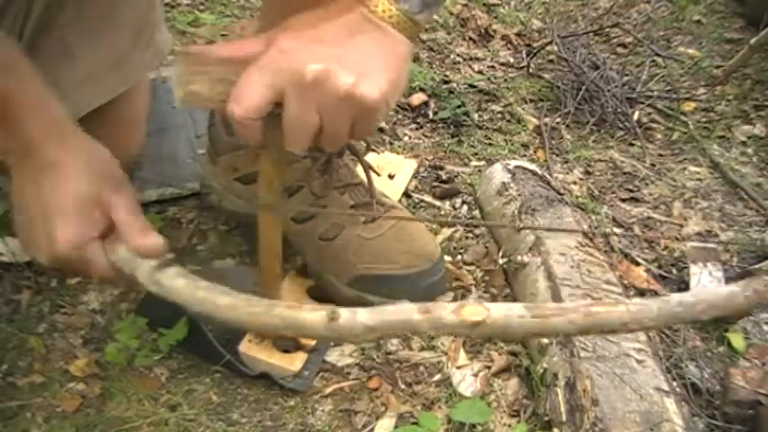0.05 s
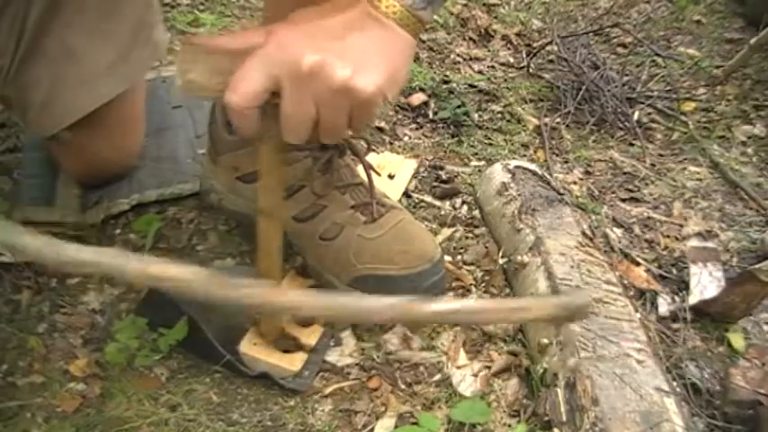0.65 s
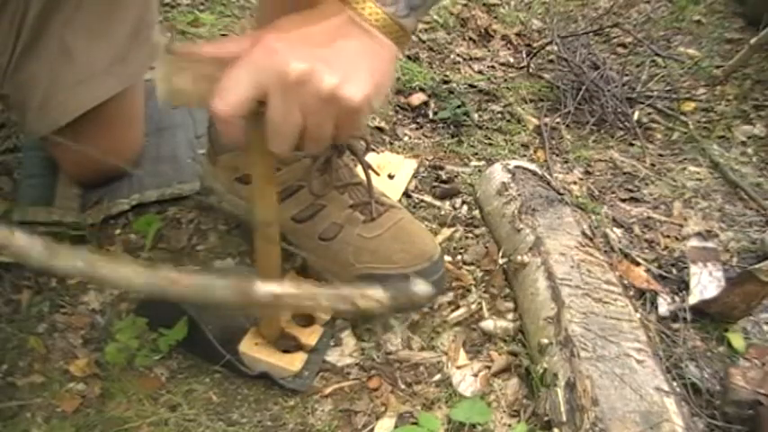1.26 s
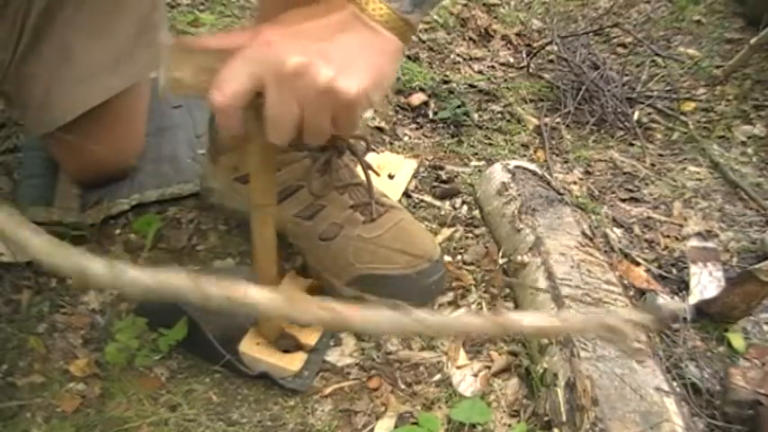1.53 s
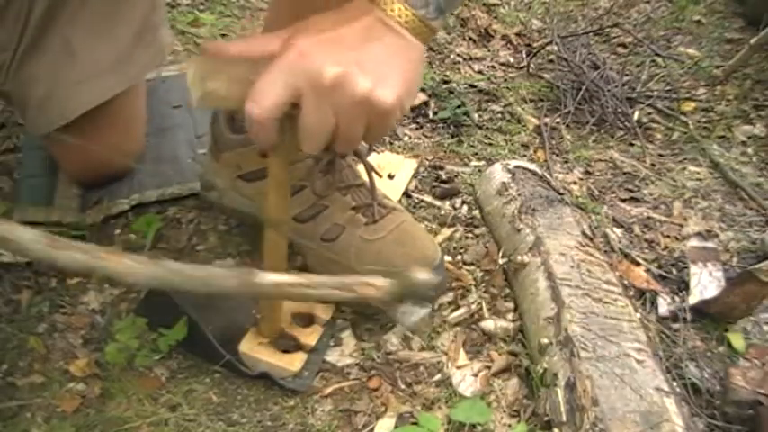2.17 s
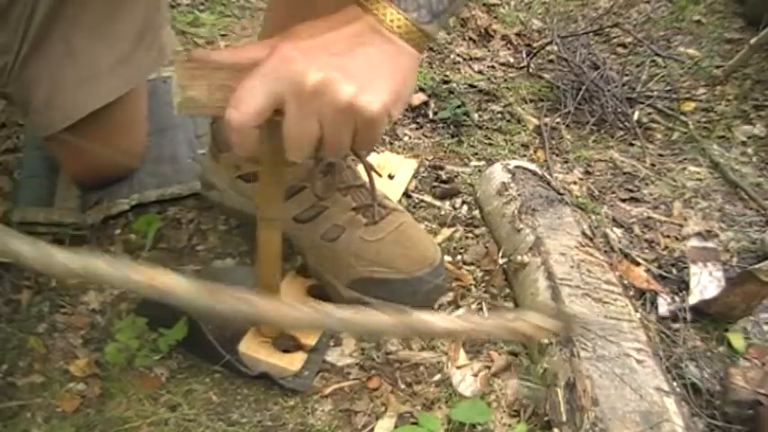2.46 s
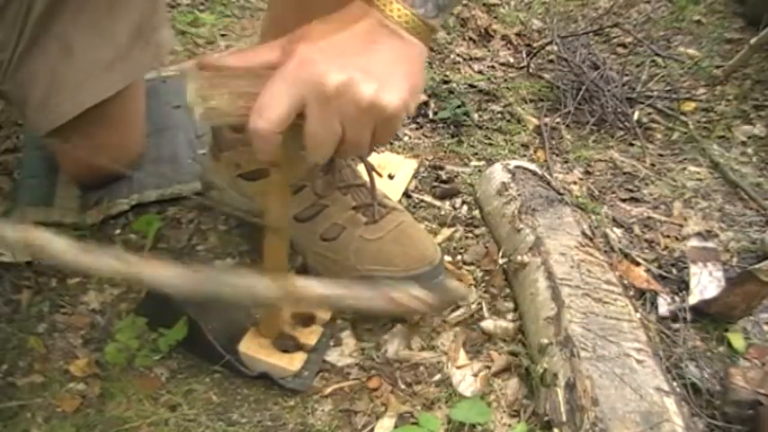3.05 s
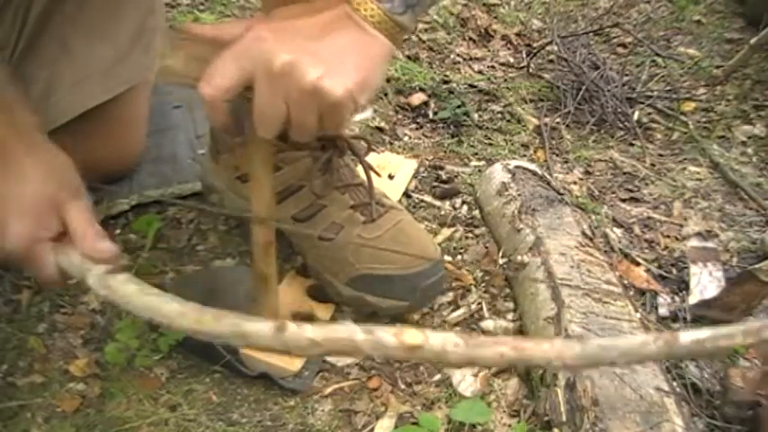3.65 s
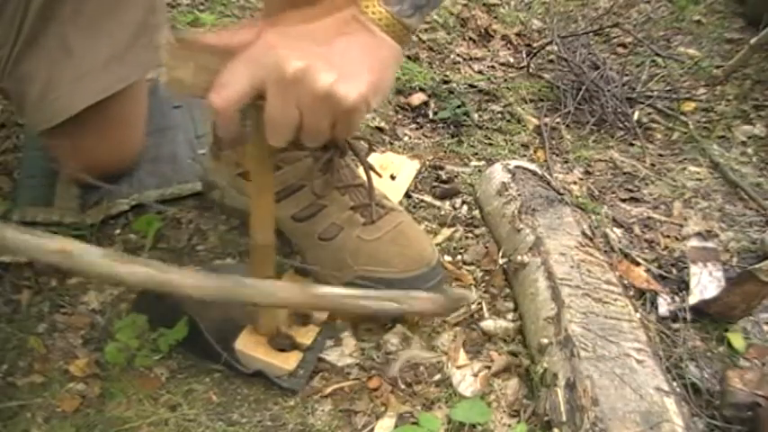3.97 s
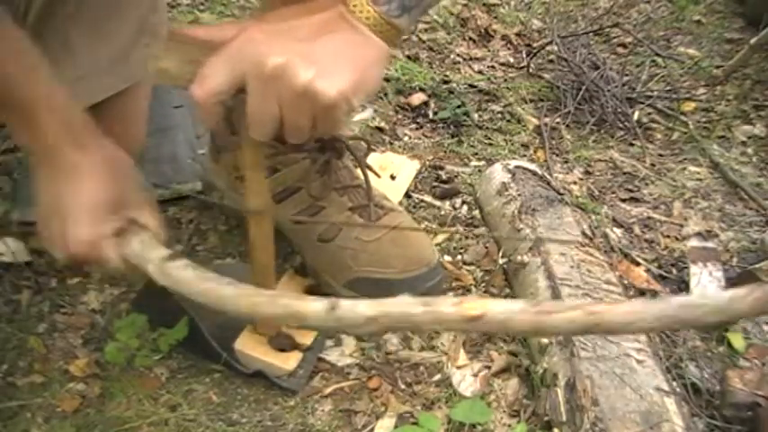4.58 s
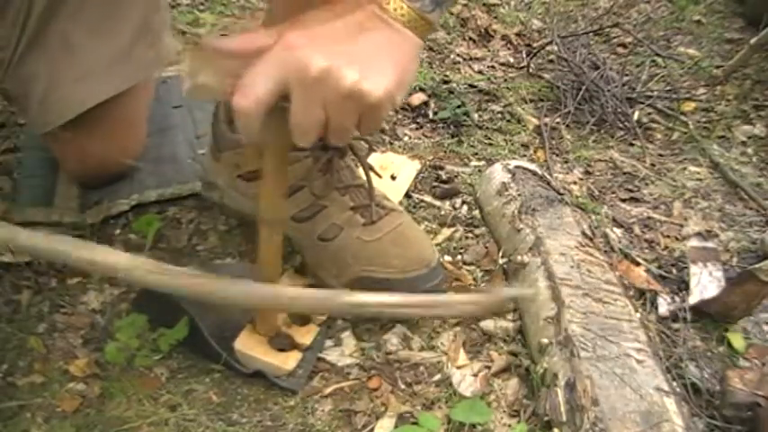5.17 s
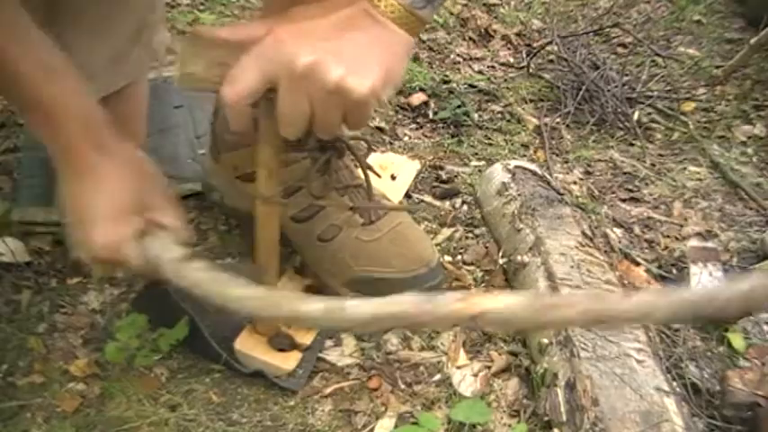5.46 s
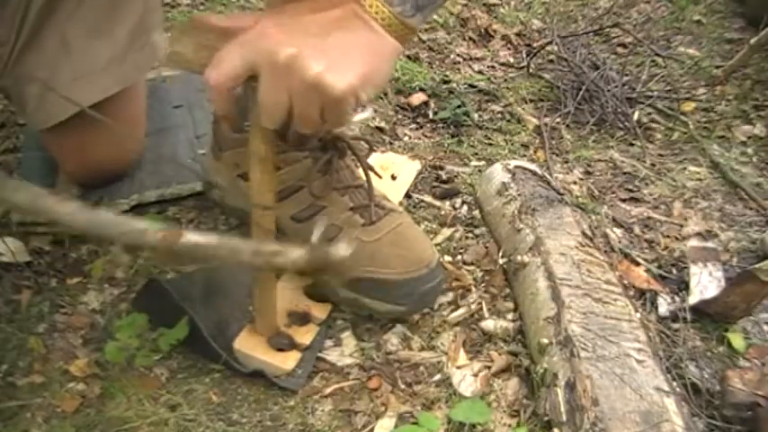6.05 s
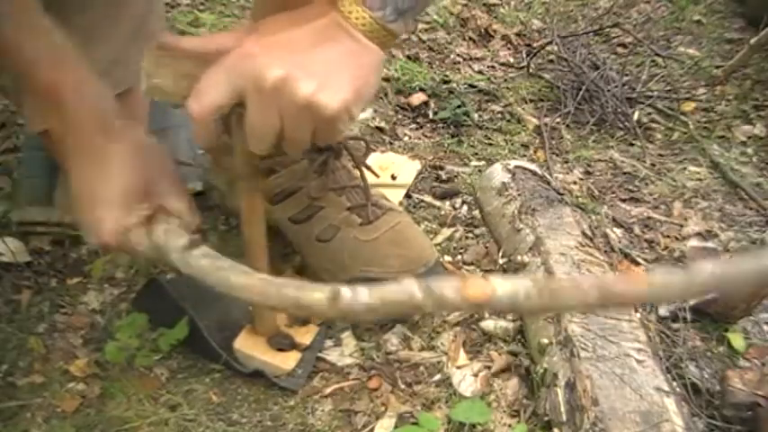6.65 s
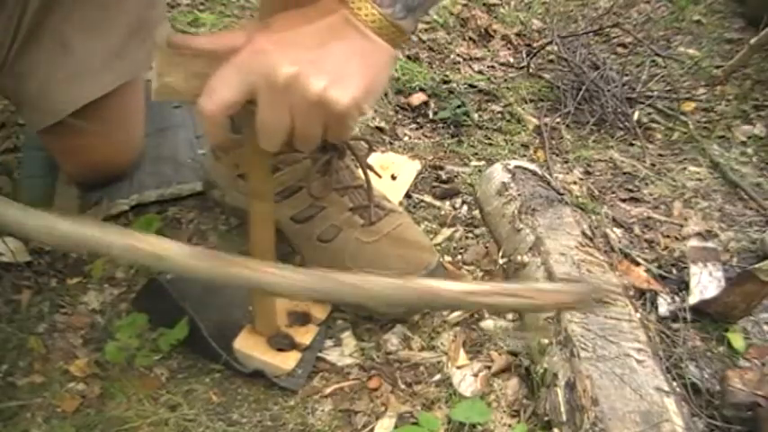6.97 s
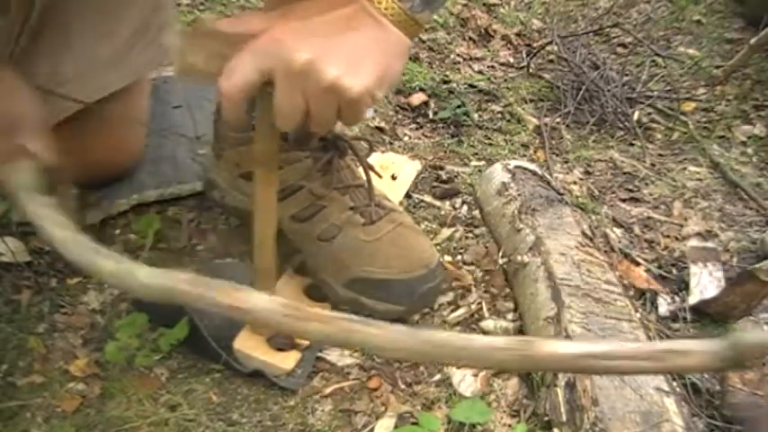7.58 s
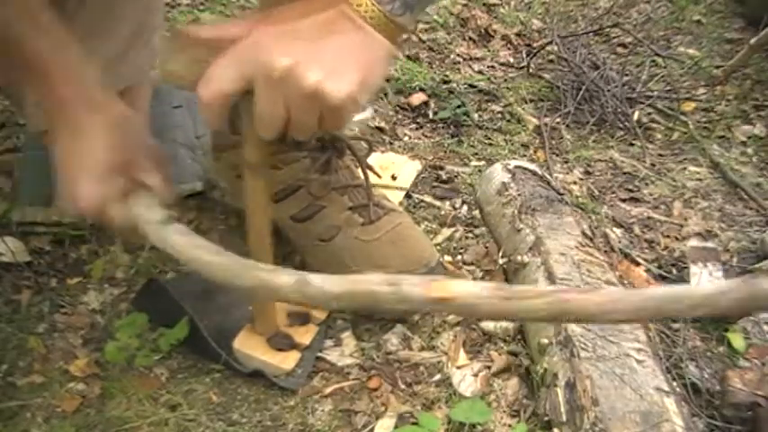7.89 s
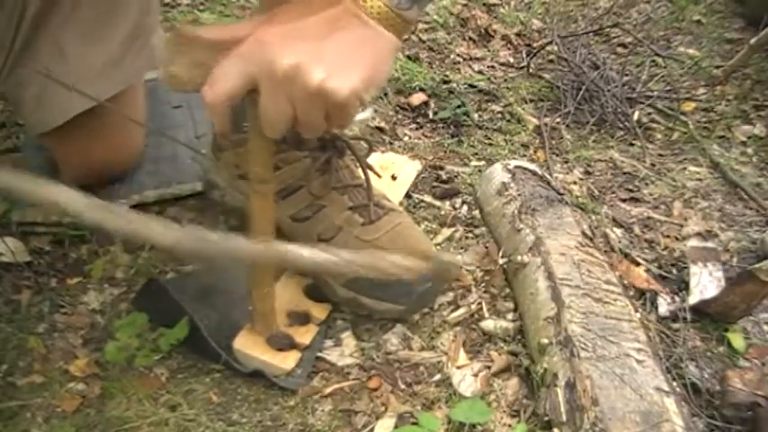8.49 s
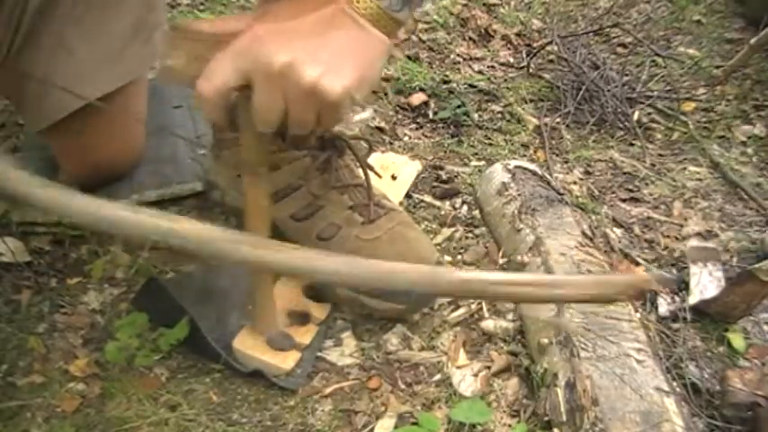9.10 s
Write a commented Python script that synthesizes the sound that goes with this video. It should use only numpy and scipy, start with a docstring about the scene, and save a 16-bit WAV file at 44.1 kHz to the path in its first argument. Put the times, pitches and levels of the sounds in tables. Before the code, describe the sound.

A wooden bow drill is sawn back and forth close to the microphone for about nine seconds, at a little over two full strokes a second. It opens with a dry, pulsing hiss of wood on wood, over faint moving air and a distant engine hum that both fade within a second or so. From 0.4 seconds, each cycle brings a short, shrill stutter of two to five squeaks, loudest around 0.9 and 1.4 seconds, where they overload slightly. The hiss recedes by 2 seconds and the squeaks carry on evenly, with single chirps between them and an occasional tiny cord creak. From about 5 seconds the squeaks become a little lower, raspier and gradually weaker. From 7.5 seconds a gritty grinding grows under them, strongest at the end, as the air and engine faintly return. The woodland adds very little echo.

```python
"""Friction sounds of a bow drill

A bow drill is sawn back and forth on a woodland floor, the spindle reversing at every stroke. Sliding
friction makes its tip hiss and grind in the hearth board. At mid-stroke the tip catches about once a turn
in a stick-slip squeal, which breaks into a rasp as charred dust gathers. The cord creaks at some
reversals; the air moves and an engine drones far away."""
import sys
import numpy as np
from scipy import signal
from scipy.fft import rfft, irfft, next_fast_len
from scipy.io import wavfile
from scipy.ndimage import uniform_filter1d

SR = 44100
rng = np.random.default_rng(int(sys.argv[2]) if len(sys.argv) > 2 else 0)


def digitize_waveform(pressure):
    """Quantize a signal to 16-bit integers and store it at the path in sys.argv[1].

    Rows of a 2-D input are taken as channels; values are limited to [-1, 1].
    """
    field = np.atleast_2d(pressure).T
    bounded = np.clip(field, -1, 1)
    quanta = np.round(bounded * 32767).astype(np.int16)
    wavfile.write(sys.argv[1], SR, quanta)


N = 411453
TIME = np.arange(N) / SR

# squeals, runs of evenly spaced catches of the tip: first t/s, last t/s, number of catches,
# first level/dB, last level/dB, mid-run swell/dB, base f/Hz, base length of a catch/s
SQUEAL_RUNS = [(0.398, 0.447, 3, -15, -15, -6, 2680, .006), (0.635, 0.662, 2, -12, -22, 0, 2640, .012),
               (0.852, 0.874, 2, -4, -4, 0, 2490, .006), (1.312, 1.357, 3, -18, -1, -7, 2390, .006),
               (1.753, 1.822, 4, -7, -10.5, -2, 2460, .011), (2.205, 2.288, 5, -12, -14, 3, 2410, .01),
               (2.637, 2.698, 4, -12, -10, 2, 2440, .01), (3.078, 3.129, 4, -10, -10, 1, 2390, .009),
               (3.545, 3.562, 2, -11, -11, 0, 2500, .012), (3.837, 3.869, 2, -18, -17, 0, 2440, .01),
               (3.973, 4.057, 4, -10.5, -15.5, 1, 2450, .0105), (4.477, 4.548, 4, -10, -26, -3, 2370, .009),
               (4.714, 4.763, 3, -26, -33, 3, 2400, .006), (4.928, 4.987, 4, -14, -23, 3, 2380, .007),
               (5.159, 5.183, 2, -24, -19, 0, 2230, .008), (5.347, 5.4, 4, -13.5, -22, -10, 2350, .009),
               (5.551, 5.581, 2, -15.5, -17.5, 0, 2330, .013), (5.735, 5.788, 3, -13, -13, -5, 2270, .014),
               (5.962, 6.006, 3, -15.5, -23, 2, 2140, .013), (6.16, 6.213, 4, -23, -23, -2, 2570, .006),
               (6.362, 6.406, 3, -13, -27, 2, 2160, .012), (6.549, 6.592, 3, -13, -24, 4, 2270, .012),
               (6.78, 6.802, 2, -16, -26, 0, 2200, .01), (6.97, 7.029, 4, -16, -22, 4, 2270, .012),
               (7.186, 7.228, 3, -21, -25, 5, 2080, .011), (7.371, 7.454, 5, -24, -18, 1, 2450, .005),
               (7.621, 7.646, 2, -17, -24, 0, 2180, .015), (7.808, 7.885, 5, -30, -28, 0, 2450, .006),
               (8.027, 8.066, 3, -14, -22, 0, 2080, .012), (8.229, 8.286, 4, -31, -32, 5, 2430, .007),
               (8.462, 8.479, 2, -29, -18, 0, 2160, .013), (8.659, 8.714, 4, -22, -27, -2, 2500, .005),
               (8.893, 8.917, 2, -32, -23, 0, 2090, .01), (9.089, 9.143, 4, -19, -29, 1, 2450, .005),
               (9.278, 9.303, 2, -32, -33, 0, 2230, .014)]
# rasp of a squeal relative to its tone: t/s, pull level/dB, push level/dB
RASP_LEVELS = [(0, -17, -17), (3, -20, -32), (4.3, -23, -37), (5.4, -15, -22), (7, -18, -29),
               (8.3, -12, -26), (9.2, -6, -24)]
# lone clean chirps, mostly as the spindle starts or stops: t/s, level/dB, length/s
LONE_CHIRPS = [(0.921, -24, .006), (1.388, -28, .005), (2.431, -16.5, .008), (2.516, -26, .009),
               (2.865, -23.5, .008), (2.945, -27.5, .008), (3.404, -22, .007), (3.782, -22.5, .008),
               (4.285, -21.5, .008), (4.445, -35, .025), (4.89, -21, .008), (5.302, -20.5, .021),
               (5.701, -14, .015), (5.72, -17, .007), (6.106, -17.5, .007), (6.522, -15.5, .01),
               (6.936, -15.5, .008), (7.846, -17, .005), (8.201, -14.5, .006), (8.308, -21, .006)]
# their pitch, sinking as the socket wears: t/s, f/Hz
CHIRP_PITCH = [(1, 2750), (2.5, 2590), (4.3, 2560), (5, 2430), (8.3, 2440)]
# overtones of a squeak: harmonic number, smooth-socket level/dB, dusty-socket level/dB
HARMONICS = [(2, -2, -2), (3, -9, -6), (4, -21, -13), (5, -26, -28)]
# pace of the bow, a cycle being one pull and one push: t/s, cycles done
BOW_CYCLES = [(-0.145, 0), (0.308, 1), (1.21, 3), (2.14, 5), (2.57, 6), (3.445, 8), (4.385, 10),
              (4.835, 11), (5.26, 12), (5.665, 13), (6.065, 14), (6.485, 15), (6.895, 16), (7.73, 18),
              (8.575, 20), (9.395, 22)]
# relative friction noise at full bow speed: t/s, hiss/dB, grinding on the pull/dB, on the push/dB
FRICTION_LEVELS = [(0, -26.5, -31, -29), (.42, -23.5, -34, -30), (.65, -31, -37, -36), (1.1, -42, -41, -48),
                   (1.35, -37.5, -38, -45), (1.6, -45, -47, -47), (2.1, -49, -56, -53),
                   (4.2, -53, -57, -58), (5.35, -49, -46, -49), (6.9, -53.5, -54, -51),
                   (7.8, -49, -41, -44), (9.3, -46, -31, -38)]
# the tip crushes a bit of grit: t/s, extra grinding/dB
GRIT_CRUSHES = [(.255, 5), (.618, 10), (1.625, 7), (7.6, 5), (7.71, 9)]
# twitter of the polished tip relative to the hiss: t/s, level/dB
TWITTER_LEVELS = [(.1, -4), (1.1, 8), (2.2, 12), (4.3, 12), (5, 3), (8, 0)]
# the cord creaks as it takes up the pull: t/s, relative level/dB, f/Hz
CORD_CREAKS = [(0.3217, -21, 6760), (2.1112, -37, 7120), (6.6915, -31.5, 8420), (6.9132, -36.5, 7376),
               (8.1655, -27.5, 7900), (9.1744, -36, 7200)]

# noise spectra: f/Hz, relative spectral density/dB
RASP_SPECTRUM = [(100, -31), (300, -10), (500, -4.5), (900, -9.5), (1300, -.5), (1650, -7.5), (2300, 3),
                 (3000, -7), (3800, 3.5), (6000, -4), (8200, 1.5), (10000, -31.5), (15000, -25)]   # chaotic slipping
HISS_SPECTRUM = [(400, -17), (1500, -12), (2500, -1), (3200, -2), (3750, 3), (4450, 7.5), (5100, -2),
                 (5900, 6), (7000, -4), (8300, 4), (9300, -11.5), (11000, -16.5), (13500, -35.5),
                 (15500, -39)]   # dry wood on wood
SMOOTH_SPECTRUM = [(60, -22.5), (180, -5.5), (335, 6.5), (420, -3.5), (560, 4.5), (900, -9.5), (1350, -1.5),
                   (3000, -38)]   # the board under a smooth socket
DUSTY_PUSH_SPECTRUM = [(100, -19), (340, -5.5), (530, 1), (950, -14), (1170, 8), (1330, 8.5), (1600, -14),
                       (2200, 2), (4000, -37.5)]   # the socket full of charred dust, on the push
DUSTY_PULL_SPECTRUM = [(100, -21), (330, -2), (530, 7), (780, 4), (1020, -13), (1400, 5.5), (1750, -1.5),
                       (2500, 3), (5000, -40)]   # the same on the pull
AIR_SPECTRUM = [(25, -16), (70, -7.5), (170, 3.5), (300, -3.5), (600, -11), (1500, -17.5), (5000, -28.5),
                (9000, -30), (15000, -55.5)]   # woodland air

# moving air: t/s, level/dB
AIR_LEVELS = [(0, -41), (.5, -44), (1, -55), (1.6, -61.5), (2.2, -66), (4.5, -66.5), (7, -72.5), (8.2, -65),
              (9.33, -56)]
# far engine: t/s, firing f/Hz, level/dB
ENGINE_FIRING = [(0, 80.2, -45), (.35, 63.3, -50.5), (1.2, 70.9, -71), (7.2, 60.3, -81.5),
                 (8.1, 97.26, -66), (9.33, 101.6, -63)]
# likeness of the noise at the two ears: f/Hz, coherence
COHERENCE = [(500, .65), (1200, .86), (2500, .95), (8500, .87)]

PULL_SHARE = .485   # of each bow cycle


def squeaks(wander=.02, rough_wander=.042, jitter=.07695, flutter_db=2.2, full_rough_db=-16):
    """Stick-slip oscillation: a harmonic tone that jitters, doubles its period and rasps under hard grip."""
    level, overtones, rasp, pitch = squeak_envelopes()
    rough = np.clip(rasp / (level + 1e-9) / from_db(full_rough_db), 0, 1)
    pitch = pitch * (1 + (wander + rough_wander * rough) * drift(87.25) + jitter * rough * drift(1034))
    phase = 2 * np.pi * np.cumsum(pitch) / SR
    share = level / np.sqrt(level ** 2 + overtones ** 2 + 1e-18)   # pitch and overtones split the power
    bright = np.sqrt(np.minimum(overtones / (level + 1e-9), 1))   # gentle catches lose the top overtones
    upper = 0
    for k, smooth_db, dusty_db in HARMONICS:
        harmonic_db = smooth_db + (dusty_db - smooth_db) * dust() + 2 * drift(120)
        upper += from_db(harmonic_db) * bright ** (k - 2) * np.sin(k * phase)
    tone = np.sqrt(2) * share * (level * np.sin(phase) + overtones * upper)
    half_harmonics = from_db(5) * dust() * rasp * drift(180) * (np.sin(phase / 2) + np.sin(1.5 * phase))
    chaos = from_db(7 + 2 * drift(300)) * rasp * noise(RASP_SPECTRUM)
    slip = tone + half_harmonics + chaos
    # each squeak is held at an even loudness, as by a fast limiter; dust under the tip makes it flutter
    flutter = from_db(.5 + flutter_db * (.5 + dust()) * np.tanh(drift(160)))
    return slip / running_rms(slip, seconds=.0017) * level * flutter


def squeak_envelopes(skirt_s=.004, skirt=.18, bend=.11, lowest_hz=1950):
    """Amplitude and frequency modulation: a squeak swells, holds and dies; its pitch slides and sags."""
    level, overtones, rasp, weight, pitch = np.zeros((5, N))
    for s, length, db, hz, overtone_db, rasp_db, fall, edge_s in catches():
        span = slice(int((s - length - .02) * SR), int((s + length + .02) * SR))
        outside_s = np.abs(TIME[span] - s) - length / 2
        grip = 1 / (1 + np.exp(outside_s / edge_s))
        swell = grip + skirt / (1 + np.exp(outside_s / skirt_s))
        grip, swell = grip / grip.max(), swell / swell.max()
        level[span] += from_db(db) * swell
        overtones[span] += from_db(db + overtone_db) * grip ** 2
        rasp[span] += from_db(db + rasp_db) * grip ** 2
        along = np.clip((TIME[span] - s) / (length / 2), -1.2, 1.2)
        give = np.clip((hz - lowest_hz) / (lowest_hz / 4), 0, 1)   # less bend near the lowest note
        sag = bend * min(from_db(overtone_db), 1) * (along ** 2 - 1 / np.pi)   # deeper under hard grip
        weight[span] += swell
        pitch[span] += swell * hz * (1 + give * (sag - fall * along))
    return level, overtones, rasp, (pitch + 1e-6) / (weight + 1e-9)


def catches(squeal_edge_s=.001, chirp_edge_s=.0016, chirp_overtone_db=-10, chirp_rasp_db=-38,
            chirp_fall=.04):
    """Static friction seizes the tip: t/s, length/s, level/dB, f/Hz, overtones/dB, rasp/dB, fall, edge/s."""
    stroke_rasp_db = np.where(bow_phase() < PULL_SHARE, *in_time(RASP_LEVELS))
    opening_db = -8 * (1 - dust())   # in a smooth socket a run opens with a cleaner catch
    for first_s, last_s, count, first_db, last_db, swell_db, run_hz, length in SQUEAL_RUNS:
        for along in np.linspace(0, 1, round(count)):
            s = first_s + along * (last_s - first_s)
            mid_run = np.sin(np.pi * along)   # mid-run catches are longer, lower and rougher
            db = first_db + along * (last_db - first_db) + swell_db * mid_run + .3 * rng.normal()
            hz = run_hz * (1 - .02 * mid_run + .009 * rng.normal())
            overtone_db = .44 * (db + 17) - .028 * (hz - 2365)   # harder, lower catches are brighter
            rasp_db = stroke_rasp_db[int(s * SR)] + 3.5 * mid_run + (along == 0) * opening_db[int(s * SR)]
            fall = .025 + .015 * rng.normal()   # downward slope of the pitch
            yield s, length * (1 + .4 * mid_run), db, hz, overtone_db, rasp_db, fall, squeal_edge_s
    for s, db, length in LONE_CHIRPS:
        hz = np.interp(s, *np.transpose(CHIRP_PITCH))
        yield s, length, db, hz, chirp_overtone_db, chirp_rasp_db, chirp_fall, chirp_edge_s


def rubbing(turns_per_s=34, turn_db=2, grain_db=2.3, hiss_db=4.5, grind_db=3):
    """Sliding friction: noise modulated by each turn; dust drones on the push and crunches on the pull."""
    speed, hiss, (pull, push) = bow()
    turn = np.sin(2 * np.pi * np.cumsum(turns_per_s * speed * from_db(drift(7.773))) / SR)
    contact = from_db(turn_db * turn + grain_db * drift(260))
    crumbs = rms_one(from_db(6 * np.tanh(drift(150)) + 3 * turn))
    drone = rms_one(from_db(4 * drift(55))) * noise(DUSTY_PUSH_SPECTRUM)
    dusty = push * drone + pull * crumbs * noise(DUSTY_PULL_SPECTRUM)
    smooth = (pull + push) * rms_one(from_db(3.5 * drift(50))) * noise(SMOOTH_SPECTRUM)
    board = np.sqrt(1 - dust()) * smooth + np.sqrt(dust()) * dusty
    friction = from_db(hiss_db) * hiss * noise(HISS_SPECTRUM) + from_db(grind_db) * board
    return contact * friction + twitter(hiss * np.sqrt(speed), turn)


def twitter(hiss, turn, hz=2630, depth_db=16):
    """At the threshold of stick-slip, the polished tip nearly catches once a turn and chirps softly."""
    level_db = in_time(TWITTER_LEVELS)[0] + 2 * drift(40) + depth_db * (turn - 1)
    pitch = hz * (1 + .03 * drift(70) + .012 * drift(700))
    return hiss * from_db(level_db) * np.sqrt(2) * np.sin(2 * np.pi * np.cumsum(pitch) / SR)


def bow(hiss_power=1.35, grind_power=2.4, slack=.14, grit_s=.01):
    """Friction noise follows a power law of sliding speed, which rises and falls on each stroke."""
    phase = bow_phase()
    arch = np.abs(np.sin(np.pi * np.interp(phase, [0, PULL_SHARE, 1], [0, 1, 2])))
    speed = np.maximum(arch - slack, 0) / (1 - slack)   # at reversals the cord stretches, the spindle rests
    hiss_db, pull_db, push_db = in_time(FRICTION_LEVELS)
    grit_db = sum(db * np.exp(-np.minimum(np.abs(TIME - s) / grit_s, 10) ** 2) for s, db in GRIT_CRUSHES)
    grind = np.array([from_db(pull_db) * (phase < PULL_SHARE), from_db(push_db) * (phase >= PULL_SHARE)])
    return speed, from_db(hiss_db) * speed ** hiss_power, grind * from_db(grit_db) * speed ** grind_power


def bow_phase():
    """Phase of the reciprocating motion, 0-1: first the pull, then the push."""
    return in_time(BOW_CYCLES)[0] % 1


def dust():
    """Abrasion fills the socket with charred dust: the share filled, 0-1."""
    return np.interp(TIME, [4.2, 5.4], [0, 1])


def creaks(rise_s=.0014, glide=.14):
    """Stick-slip of the cord on the spindle gives tiny rising chirps."""
    out, t = np.zeros(N), np.arange(SR // 40) / SR
    envelope = t / rise_s * np.exp(1 - t / rise_s)
    shake = drift(900)
    for s, db, hz in CORD_CREAKS:
        span = slice(int(s * SR), int(s * SR) + len(t))
        pitch = hz * (1 + glide * np.tanh(t / rise_s / 2 - 1) + .029 * shake[span])
        out[span] += from_db(db - 3) * envelope * np.sin(2 * np.pi * np.cumsum(pitch) / SR)
    return out


def woodland_echo(x, near_db=-20, near_s=.015, far_db=-29, t60_s=.6):
    """Scattering: quick reflections from ground and boot, then a faint diffuse tail from the trees."""
    t = np.arange(SR // 2) / SR
    near, far = rng.standard_normal((2, 2, len(t)))
    near, far = near * np.exp(-t / near_s), far * from_db(-60 * t / t60_s)
    far = signal.sosfilt(signal.butter(2, [1900, 7500], "band", fs=SR, output="sos"), far)
    response = (from_db(near_db) * rms_one(near) + from_db(far_db) * rms_one(far) / 2) / np.sqrt(len(t))
    return signal.fftconvolve(x, response, axes=1)[:, :N]


def far_engine():
    """Periodic firing radiates a wavering fundamental and a weaker octave."""
    hz, db = in_time(ENGINE_FIRING)
    phase = 2 * np.pi * np.cumsum(hz * (1 + .022 * drift(7.8))) / SR
    return from_db(db + 2 * drift(5)) * (np.sin(phase) + .3 * np.sin(2 * phase))


def moving_air():
    """Turbulence gives broadband noise, strongest in the bass."""
    return from_db(in_time(AIR_LEVELS)[0] + drift(8.3)) * noise(AIR_SPECTRUM)


def noise(spectrum):
    """Partly coherent stereo noise of a given spectrum, less alike in the bass; rms 1."""
    size = next_fast_len(N)
    hz = np.arange(size // 2 + 1) * SR / size
    mid, side = rfft(rng.standard_normal((2, size))) * from_db(at_hz(spectrum, hz))
    alike = np.clip(at_hz(COHERENCE, hz), 0, 1)
    ears = np.sqrt(1 + alike) * mid + np.sqrt(1 - alike) * side * [[1], [-1]]
    return rms_one(irfft(ears, size)[:, :N])


def drift(corner_hz):
    """Random fluctuation: low-passed noise of rms 1."""
    r = np.exp(-2 * np.pi * corner_hz / SR)
    return rms_one(signal.lfilter([1], [1, -2 * r, r * r], rng.standard_normal(N + SR))[SR:])


def from_db(db):
    """Level to amplitude ratio."""
    return 10 ** (np.asarray(db) / 20)


def rms_one(x):
    """Normalisation to unit power."""
    return x / np.sqrt(np.mean(x ** 2) + 1e-20)


def running_rms(x, seconds):
    """Short-time rms over both channels."""
    return np.sqrt(np.abs(uniform_filter1d(np.mean(x ** 2, axis=0), int(seconds * SR))) + 1e-16)


def in_time(rows):
    """Linear interpolation of each column at every sample."""
    s, *columns = np.transpose(rows)
    return [np.interp(TIME, s, column) for column in columns]


def at_hz(points, hz):
    """Interpolation on a log-frequency axis."""
    f, value = np.transpose(points)
    return np.interp(np.log(hz + 1), np.log(f), value)


def limiter(x, ceiling=.53, attack_s=.009, release_db_per_s=300):
    """Gain control with a finite attack: the first cycles of a loud squeak pass before the gain falls."""
    excess_db = 20 * np.log10(np.maximum(np.abs(x).max(axis=0) / ceiling, 1))
    held_db = np.maximum.accumulate(excess_db + release_db_per_s * TIME) - release_db_per_s * TIME
    r = np.exp(-1 / (attack_s * SR))
    return x * from_db(-signal.lfilter([1 - r], [1, -r], held_db))


def scene(left_db=1):
    """Superposition of the close drill, its echo and the background, all a little louder on the left."""
    drill = rubbing() + squeaks() + creaks()
    return (drill + woodland_echo(drill) + far_engine() + moving_air()) * from_db([[left_db], [-left_db]])


def record(dry, knee=.26, buzz_db=-1, stopband_hz=16500):
    """Overload: loud squeaks are limited and overdrive the input into a low buzz; the top is cut."""
    held = np.clip(limiter(dry), -1, 1)
    excess = np.clip(np.abs(held) - knee, 0, knee)
    buzz = signal.sosfilt(signal.butter(1, [70, 260], "band", fs=SR, output="sos"), excess * drift(4900))
    low_pass = signal.cheby2(14, 70, stopband_hz, fs=SR, output="sos")
    return signal.sosfilt(low_pass, held + from_db(buzz_db) * buzz)


dry = scene()
out = record(dry)
digitize_waveform(out)
```